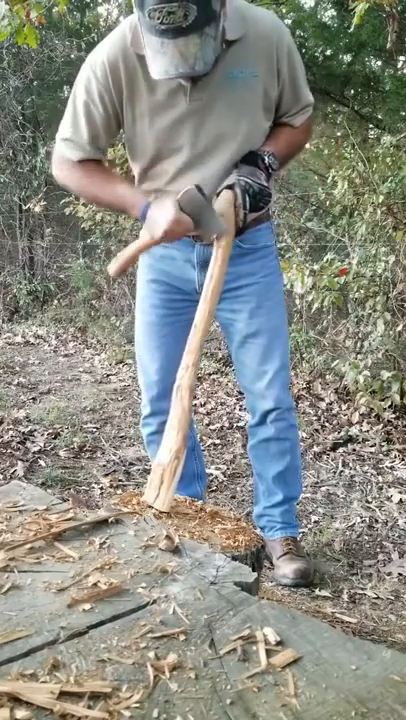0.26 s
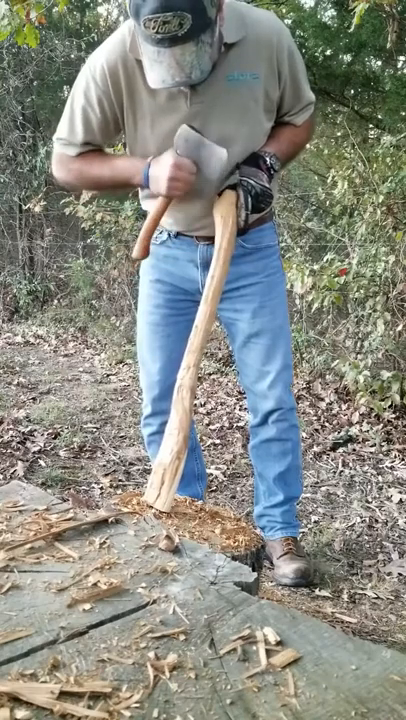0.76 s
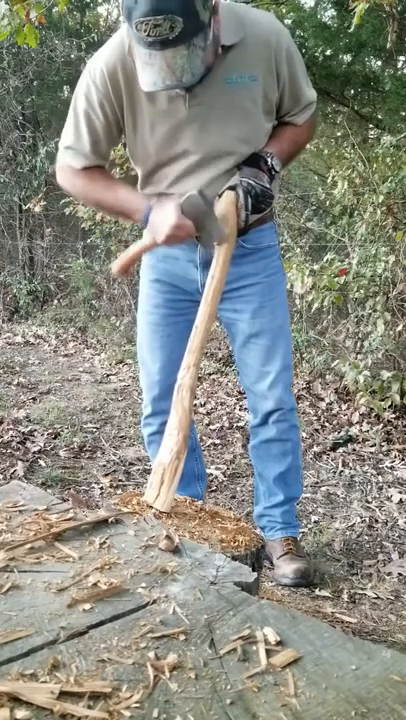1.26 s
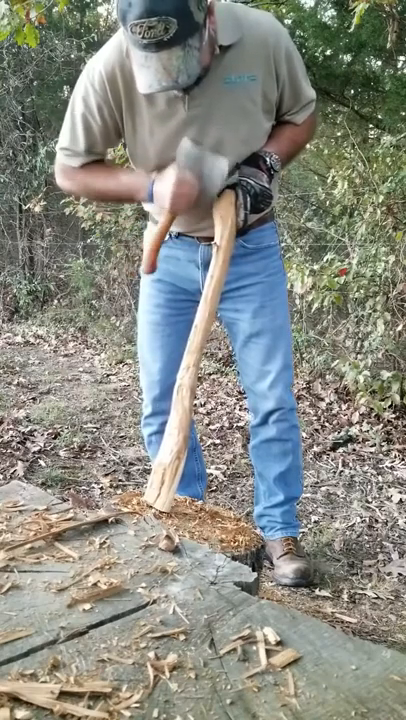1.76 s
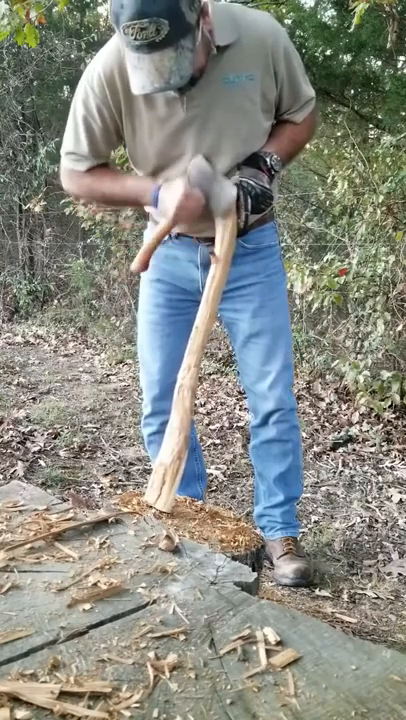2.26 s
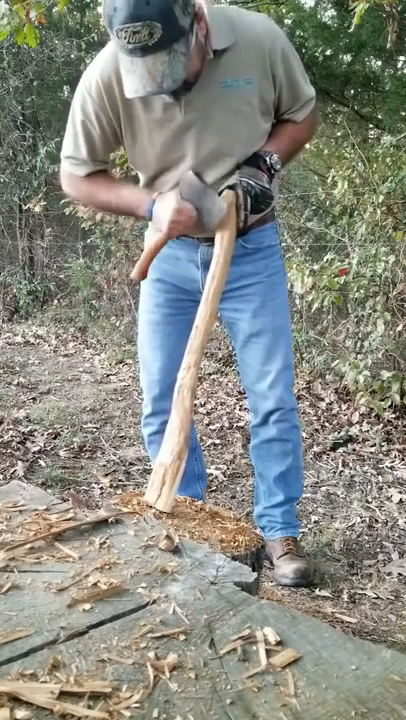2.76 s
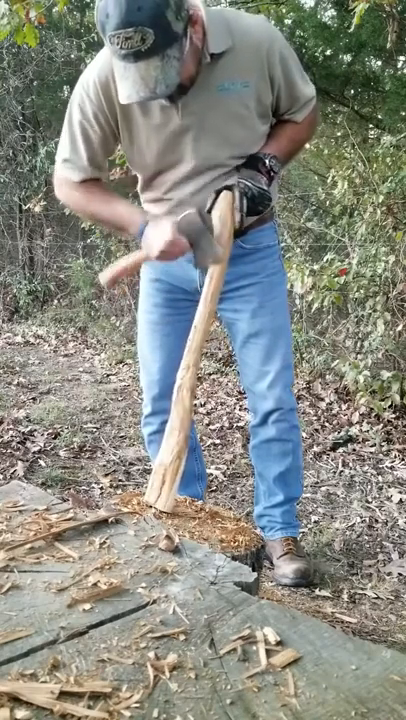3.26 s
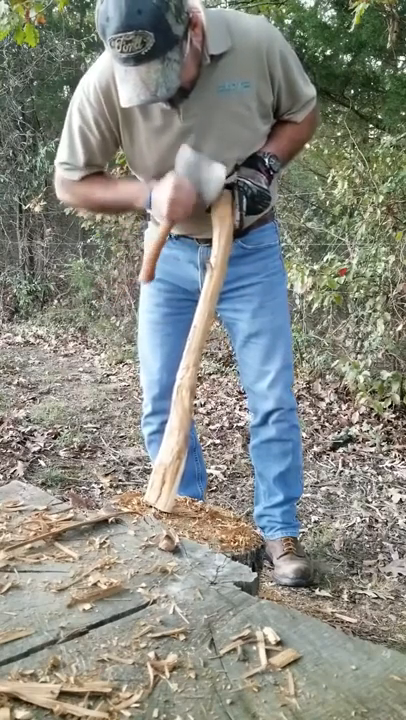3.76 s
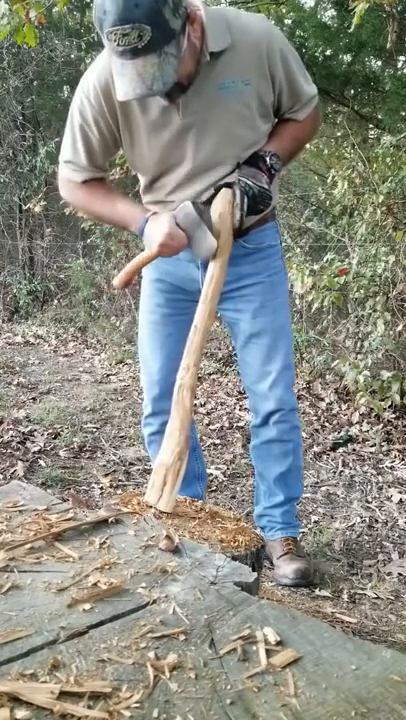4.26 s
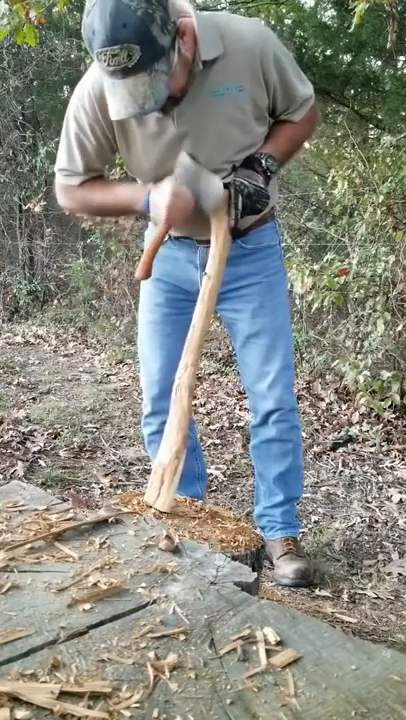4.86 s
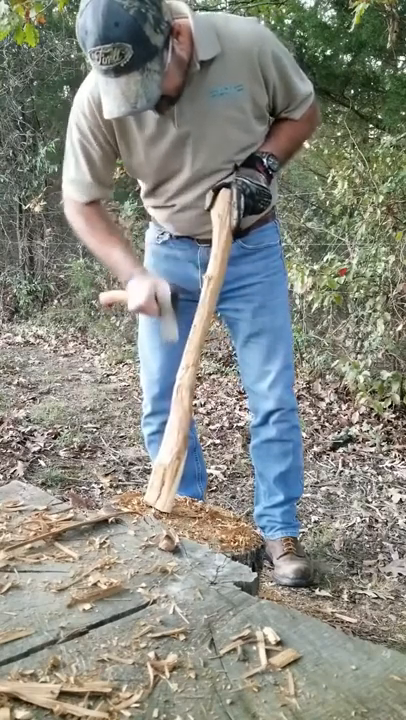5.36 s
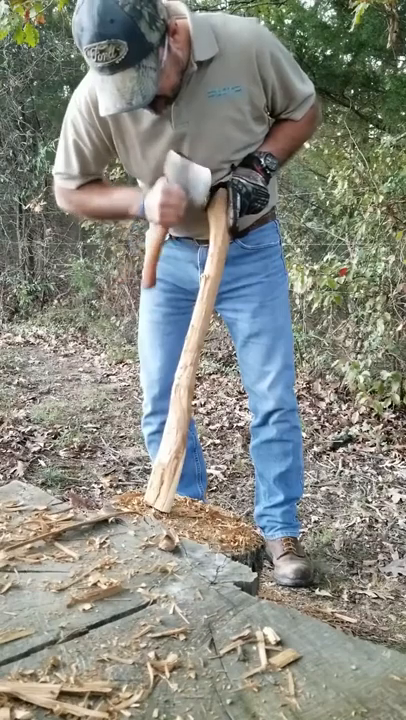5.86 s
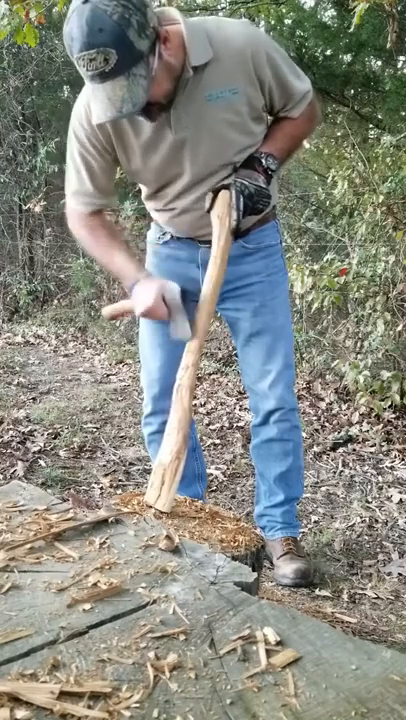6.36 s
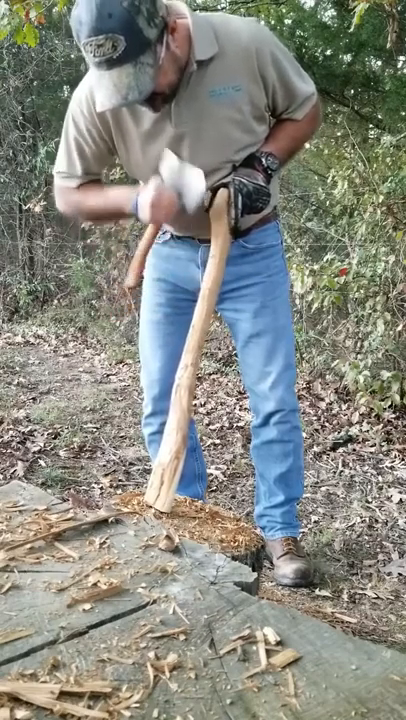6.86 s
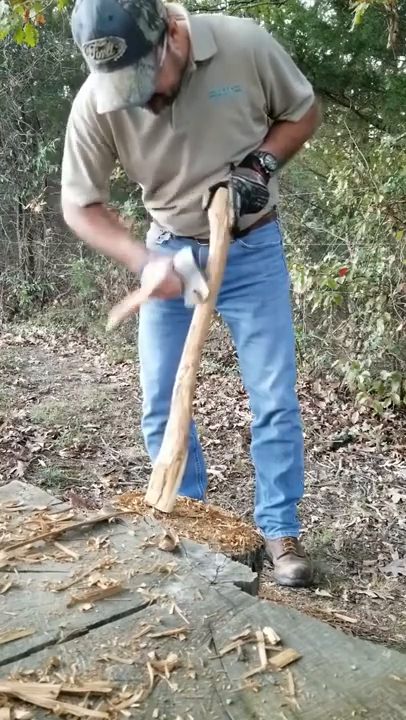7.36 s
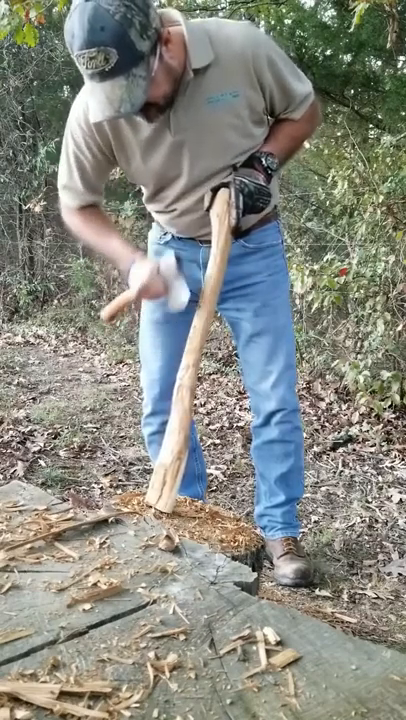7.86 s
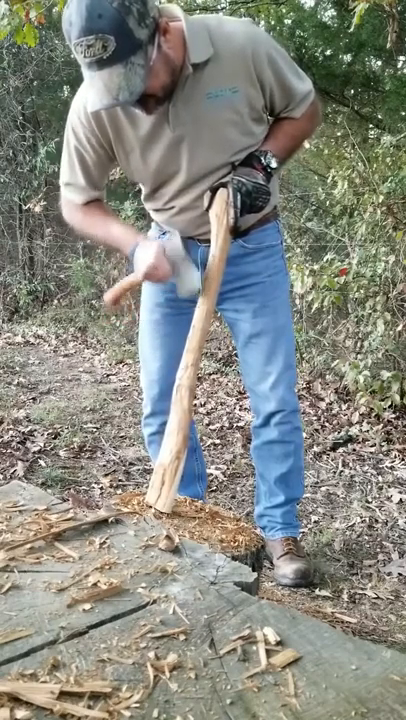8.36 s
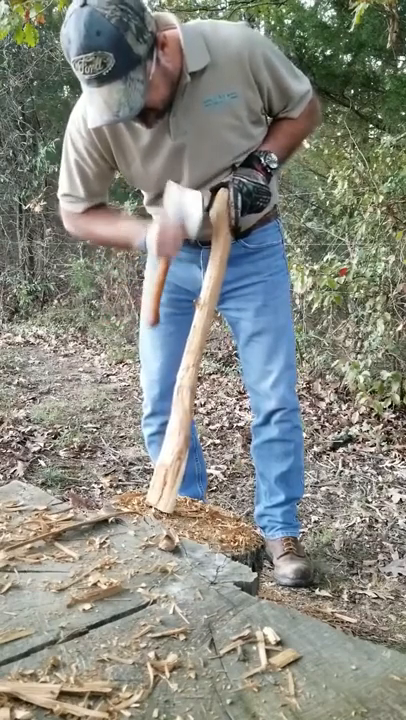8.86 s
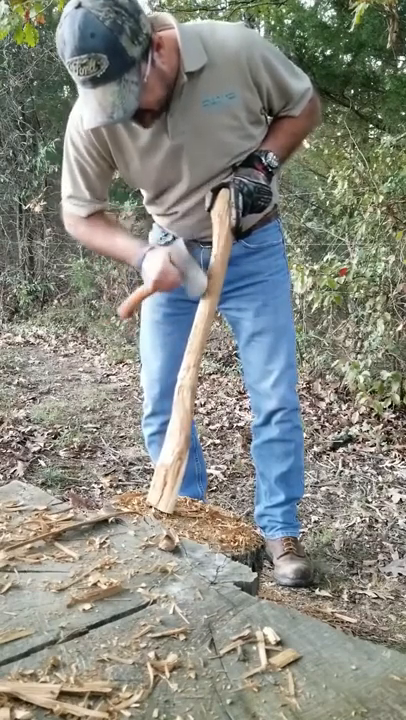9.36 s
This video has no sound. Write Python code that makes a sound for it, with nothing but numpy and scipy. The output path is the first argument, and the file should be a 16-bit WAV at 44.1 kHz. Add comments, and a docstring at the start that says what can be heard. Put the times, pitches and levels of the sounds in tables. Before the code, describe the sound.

A hatchet chops a dry hardwood stick outdoors in short runs of sharp, ringing whacks, over faint crickets and a low distant traffic hum.

```python
"""At the edge of a wood, trees still answer an earlier chop over a traffic hum and a vehicle fading out.
Six crickets trill: runs of short falling tones, smeared together by distance.
Then a man shapes a dry hardwood stick with a hatchet, in short runs of chops: noise bursts knock the wood,
decaying sines ring stick and steel, dense snaps tear splinters, and scattered echoes answer from the trees.
The blade snags, chips drop in the leaves, and late on a swing ends against the leg with a sinking thud."""
import sys
import numpy as np
from scipy import signal
from scipy.fft import rfft, irfft
from scipy.io import wavfile

SR = 44100
rng = np.random.default_rng(int(sys.argv[2]) if len(sys.argv) > 2 else 0)


def wav_out(sig):
    """Save sig, one row per channel (or a flat mono array), as 16-bit PCM at SR to the path in sys.argv[1]."""
    wavfile.write(sys.argv[1], SR, np.round(np.clip(np.atleast_2d(sig).T, -1, 1) * 32767).astype(np.int16))


N = 423360

# colour of the wood's dense, dying modes: f/Hz, gain/dB
WOOD_COLOUR = [(60, -3), (180, 9), (300, 8), (550, 12), (800, 13), (1200, 15), (2100, 17), (2850, 1),
               (3400, 11.5), (4600, 8.5), (6100, -7), (7800, 7.5), (9000, -14), (16000, -1)]
# colour of the answer from the trees: f/Hz, gain/dB
TREE_COLOUR = [(100, -28), (200, -16.5), (450, -28), (900, -26), (1250, -21), (1800, -20.5), (2800, -19),
               (3700, -14.5), (4600, -23), (6000, -16.5), (7700, -26), (12000, -20)]


def amp(db):
    """Decibels to linear gain."""
    return 10 ** (np.asarray(db) / 20)


def evened(x):
    """Bring a sound to rms 1."""
    return x / np.sqrt(np.mean(x ** 2) + 1e-20)


def read(points, hz):
    """A curve's value, interpolated on a log-frequency axis."""
    f, value = np.transpose(points)
    return np.interp(np.log(hz + 1), np.log(f + 1), value)


def add(mix, s, sound):
    """Lay a sound into the mix at s seconds, cut at the end."""
    part = mix[..., max(round(s * SR), 0):][..., :sound.shape[-1]]
    part += sound[..., :part.shape[-1]]


def colour(x, points, size=4096):
    """Causal (minimum-phase) filter with the given gains."""
    log_gain = np.log(amp(read(points, abs(np.fft.fftfreq(size, 1 / SR)))))
    spectrum = np.exp(np.conj(signal.hilbert(log_gain)))
    taps = np.fft.ifft(spectrum).real[:size // 2]
    return np.apply_along_axis(lambda row: signal.oaconvolve(row, taps)[:len(row)], -1, x)


def drift(rate, size):
    """Slow random wander of rms 1, made of noise rolled off around rate Hz."""
    rolloff = np.exp(-(np.fft.rfftfreq(size, 1 / SR) / rate) ** 2)
    return evened(irfft(rfft(rng.standard_normal(size)) * rolloff, size))


def dying(t, t60):
    """Exponential decay that falls 60 dB in t60 seconds."""
    return np.exp(-np.log(1000) * t / t60)


def crackle(envelope, per_s, spread_db):
    """Separate tiny snaps of uneven size under an envelope, energy 1."""
    size = len(envelope)
    happens = rng.random(size) < per_s / SR
    sign = rng.choice([-1, 1], size)
    strength = amp(spread_db * np.minimum(rng.exponential(1, size), 4))
    return evened(happens * sign * strength * envelope) / np.sqrt(size)


def partly_shared(draw, apart):
    """A long stick radiates a little differently toward each microphone."""
    left, other, apart = draw(), draw(), np.clip(apart, 0, 1)
    return np.array([left, np.sqrt(1 - apart ** 2) * left + apart * other])


def echoes(build):
    """Scattered echoes from trunks and leaves, one train per microphone, each band dying at its own speed."""
    # decay of the echoes: f/Hz, t60/s
    tree_decay = [(150, 0.75), (1200, 0.49), (2000, 0.49), (4000, 0.44), (7500, 0.35), (14000, .3)]
    taps = rng.standard_normal((2, SR)) * (rng.random((2, SR)) < 5000 / SR)  # 5000 echoes per s
    taps *= 1 - np.exp(-(np.arange(SR) / SR / build) ** 2)
    hz, t, bands = signal.stft(taps, SR, nperseg=256)
    fade = dying(t, read(tree_decay, hz)[:, None])
    fade_energy = np.linalg.norm(fade, axis=1, keepdims=True)
    tails = signal.istft(bands * fade / fade_energy, SR, nperseg=256)[1]
    return tails / np.linalg.norm(tails, axis=1, keepdims=True)


def earlier_chop(level_db=-2, ago=0.078):
    """The trees are still answering a chop struck just before the scene opens."""
    out = np.zeros((2, N))
    answer = colour(colour(echoes(.022), TREE_COLOUR), WOOD_COLOUR)
    add(out, 0, amp(level_db) * answer[:, int(ago * SR):])
    return out


def background(apart=.3, waver_db=1.0, rumble_gain_db=2, roar_gain_db=-0.78, swell_db=0.53):
    """Traffic rumble and tyre roar ebb slowly, with a wavering hum and a thin hiss of far insects."""
    # colour of distant traffic: f/Hz, gain/dB
    traffic_colour = [(12, -47), (20, -9), (87, 3), (135, -5), (192, -7), (281, -14), (464, -13.5),
                      (610, -10.5), (871, -9), (1100, -23), (1220, -22), (1500, -36.5), (2060, -34.5),
                      (2190, -48), (3000, -48), (3900, -64.5), (6600, -120)]
    # steady tones in the traffic: f/Hz, level before the waver/dB
    hum_tones = [(188, -79.5), (468, -83.5)]
    # colour of far insects and hiss: f/Hz, gain/dB
    air_colour = [(1500, -10), (2600, 2.5), (3300, 3.5), (3850, 17), (4300, 3), (5000, 0.5), (16000, 0.5)]
    # a vehicle is just leaving, tyres fading before engine: extra level at first/dB, fade time/s
    leaving_rumble = (5.5, 2.2)
    leaving_roar = (8.3, .8)
    traffic_db, air_db = -62.5, -76
    t = np.arange(N) / SR

    mid, side = (amp(traffic_db) * evened(colour(rng.standard_normal(N), traffic_colour)) for _ in range(2))
    side = colour(side, [(100, -7), (400, -0.5), (1200, 6.5)])
    traffic = np.array([mid + apart * side, mid - apart * side])
    rumble = signal.sosfiltfilt(signal.butter(2, 300, fs=SR, output="sos"), traffic)
    roar = traffic - rumble
    rumble_db = rumble_gain_db + leaving_rumble[0] * np.exp(-(t / leaving_rumble[1]) ** 2)
    roar_db = roar_gain_db + leaving_roar[0] * np.exp(-t / leaving_roar[1])
    rumble = rumble * amp(rumble_db + waver_db * drift(6.8, N))
    roar = roar * amp(roar_db + swell_db * drift(3.2, N))

    hum = np.zeros(N)
    for hz, db in hum_tones:
        level = amp(db + drift(2, N)) * np.sqrt(2)
        wavering_hz = hz * (1 + 0.0065 * drift(16, N))
        hum += level * np.sin(2 * np.pi * np.cumsum(wavering_hz) / SR)
    air = np.array([evened(colour(rng.standard_normal(N), air_colour)) for _ in range(2)])
    return rumble + roar + hum + amp(air_db) * air


def trill(hz, rate, length, smear, sweep=.042, haze=0.3, uneven_db=0.34):
    """Each wing stroke is a short tone that falls in pitch; distance smears the strokes together."""
    edge_s = 0.22  # swell and fade of a fully smeared trill; near ones start almost at once
    t = np.arange(int(length * SR)) / SR
    smear, stroke = np.clip(smear, 0, 1), t * rate % 1
    phase = 2 * np.pi * np.cumsum(hz * (1 + sweep * (.5 - stroke))) / SR
    pulse = np.sin(np.pi * stroke) ** 4 * amp(uneven_db * drift(20, len(t)))
    carrier = 2 * np.pi * hz * t
    scatter = np.array([drift(120, len(t)) * np.cos(carrier) + drift(100, len(t)) * np.sin(carrier)
                        for _ in range(2)])
    edges = np.minimum(np.minimum(t, length - t) / (edge_s * smear ** 3 + 1e-4), 1)
    direct = (1 - smear) * pulse * np.sin(phase)
    smeared = smear ** 2 * 2 * scatter * (haze + 0.064 * pulse)
    return edges * (direct + smeared)


def crickets():
    """Six crickets repeat their trills, each at its own pitch and distance."""
    # one row a cricket: f/Hz, level before smearing/dB, pulse rate/Hz, trill length/s,
    # smear by distance (0-1), starts of its trills t/s
    singers = [(3880, -50, 35.7, .38, .46, (1.049, 3.675, 6.828)),
               (3700, -53.5, 37, 0.506, .52, (1.296, 3.767, 6.09, 8.775)),
               (4110, -61, 33, .41, .56, (2.81, 5.36, 7.7)), (3890, -59, 24, 0.47, .76, (3.1, 5.5, 8.26)),
               (3770, -62, 29, .46, 0.63, (2.55, 4.62, 7.03, 9.38)),
               (3980, -68.5, 36, .48, 0.6, (.03, .7, 3.22, 6.15, 9.23))]
    out = np.zeros((2, N))
    for hz, db, rate, length, smear, starts in singers:
        for s in starts:
            add(out, s, amp(db) * trill(hz, rate, length, smear))
    return out


def ports(pair):
    """The right microphone hears the sound shaded, with a phase lag that varies with frequency."""
    # shading of the right microphone: f/Hz, gain/dB
    shade = [(150, -0.5), (400, -3.5), (800, -3.5), (1400, -3), (3500, 0.5), (5300, 0.5), (6500, -18),
             (7800, -12.5), (16000, -17.5)]
    # right behind left: f/Hz, phase lag/rad
    phase_lag = [(0, -0.5), (500, 0.08), (1200, 1.84), (2500, 1.33), (5000, 1.89), (8000, 3.9),
                 (16000, 2.5)]
    lag = np.interp(np.fft.rfftfreq(N, 1 / SR), *np.transpose(phase_lag))
    right = irfft(rfft(colour(pair[1], shade)) * np.exp(-1j * lag), N)
    return np.array([pair[0], right])


def follow(law, force_db, glance):
    """Level of one part of a chop, from the force of the blow and how far it slides."""
    plain_db, per_db, sliding_db = law
    return plain_db + per_db * force_db + sliding_db * glance


def stick_ring(t, thump_db, main_db, upper_db, glance, detune=0.0049, scatter_db=2.0,
               right_lag=.00008, bend_s=.005):
    """The stick's modes; grip and point of impact shift them a little, and the slow bending wave comes late."""
    # modes of the stick: f/Hz, t60/s, left level/dB, right level/dB, extra in a full slide/dB
    stick_modes = [(132.9, 0.083, -21, -20, 0), (144.8, 0.063, -20.5, -17.5, -0.5),
                   (185, 0.083, -40, -38.5, 10.5), (230, 0.11, -38.5, -42.5, -1.5),
                   (580, 0.036, -26.5, -24.5, 0.5), (726, .07, -38, -47.5, 19),
                   (1145, 0.024, -11, -12.5, 1.5), (1215.4, 0.088, -25, -20, 9.5),
                   (1264, 0.074, -27, -20, -5), (1383, 0.028, -16.5, -13, -5),
                   (1560, 0.028, -30, -26.5, -7.5), (1723, .05, -23, -19, -3.5),
                   (1795, 0.06, -22.5, -17.5, -5), (1997, 0.13, -36.5, -35, -2),
                   (2652, 0.096, -39.5, -37, 5.5), (3200, 0.045, -37, -35, -1),
                   (4750, 0.046, -35, -42.5, -3), (5295, .02, -29.5, -33.5, 3)]
    hz, t60, left_db, right_db, glance_db = np.transpose(stick_modes)
    pitch, size = rng.standard_normal((2, len(hz)))
    drive_db = np.interp(hz, [200, 500, 1400, 1700], [thump_db, main_db, main_db, upper_db])
    opposite = (-1) ** np.arange(len(hz))  # neighbouring modes start in opposite phase
    drive = opposite * amp(drive_db + glance * glance_db + scatter_db * size)
    mode_hz = (hz * (1 + detune * pitch))[:, None]
    bending = (hz < 200)[:, None]
    ears = []
    for ear_db, lag in ((left_db, 0), (right_db, right_lag)):
        age = np.maximum(t - lag - bend_s * bending, 0)
        waves = np.sin(2 * np.pi * mode_hz * age) * dying(age, t60[:, None])
        ears.append((drive * amp(ear_db)) @ waves)
    return np.array(ears)


def impact(t, knock_db, crack_db, crunch_t60, sharp, bite=.65, wood_t60=0.077):
    """A sharp push with a short crunch as the edge sinks in, then the dense modes of the wood."""
    # colour of the blow: f/Hz, gain/dB
    blow_colour = [(60, -22.5), (200, 0), (400, 16), (560, 18), (720, 8.5), (1100, 21), (1500, 16.5),
                   (2200, 5), (2900, 6.5), (3600, 2.5), (4700, 11.5), (6200, -4), (9000, -17),
                   (16000, -7.5)]
    push = bite * partly_shared(lambda: crackle(dying(t, crunch_t60), per_s=8300, spread_db=0.5), apart=0.95)
    push = signal.sosfilt(signal.butter(2, 1500, "high", fs=SR, output="sos"), push)
    push[:, 0] += sharp  # a single click at the moment of contact
    wood = partly_shared(lambda: evened(rng.standard_normal(len(t)) * dying(t, wood_t60)), apart=.65)
    wood = wood / np.sqrt(len(t))
    blow = colour(push, blow_colour) + colour(wood, WOOD_COLOUR)
    return colour(blow, [(900, knock_db), (3000, crack_db)])


def steel_ring(t, glance, grip, free=0.43, damped=.3, scatter_db=2.0, detune=0.005, clamp=0.022):
    """The head rings longer when it slides off; gripped by the wood (0-1) it is damped and a little sharp."""
    # modes of the hatchet head: f/Hz, free t60 in a square blow/s, level/dB
    head_modes = [(7590, .06, -34), (7700, 0.048, -27), (7940, .035, -33), (8080, 0.027, -38)]
    ring = np.zeros(len(t))
    for hz, t60, db in head_modes:
        level = amp(db + scatter_db * rng.standard_normal())
        mode_hz = hz * (1 + clamp * grip + detune * rng.standard_normal())
        decay = dying(t, t60 * (1 + free * glance) / (1 + damped * grip))
        ring += level * np.sin(2 * np.pi * mode_hz * t) * decay
    return ring


def splinter(t, gives, tear_t60=0.042, snap_t60=0.0031, snap=2.3, first=0.53, last=.7):
    """Fibres tear under rising strain, give with a snap, and die away."""
    after = np.maximum(t - gives, 0)
    rising = first + (last - first) * t / gives
    release = dying(after, tear_t60) + snap * dying(after, snap_t60)
    strain = np.where(t < gives, rising, release)
    return partly_shared(lambda: crackle(strain, per_s=7000, spread_db=-0.5), apart=0.87)


def hatchet(steel_db=-2.0, grip_from_db=-5, grip_range_db=7.0, snag_ring_db=-3,
            snag_thump_db=-16, snag_crack_db=-4.0, snag_steel_db=2.0):
    """All chops, snags and falling chips, as they reach the two microphones."""
    # one row a chop: t/s, force/dB, glance (0 square bite - 1 sliding blow), crack/dB,
    # bending thump/dB, steel ring/dB, splinter/dB; levels are relative
    chop_rows = [(.237, -0.5, 0.33, 0, 4, -10, -5.5), (.5518, 0.5, 0.38, -3.5, 0, -7, 2.5),
                 (1.233, 0.5, 0.079, -7, -4, 2, -1), (1.5355, 2.5, 0.33, -.5, -6, 2.5, -.5),
                 (1.8235, 1.5, 0.19, -2, 3, 6.5, -1.5), (2.1117, 1, 0.028, 0, 0, 7, 5),
                 (2.424, -2.5, 0.22, 0, -13, 13.5, -0.5), (3.223, -1, 0, -7, -5.5, 1, -6),
                 (3.5322, 1, 0, .5, -4.5, 4, 0.5), (3.8308, -0.5, 0.3, -3, -5, 6.5, -3.5),
                 (4.7119, -5.5, .1, -13, -9, -8.5, -2), (5.0037, -2, 0.54, -2.5, 1.5, 3, 3.5),
                 (5.2844, -7, .7, -16, -8.5, 1, -3.5), (5.9444, -2.5, .75, -10.5, -8.5, -3, -10.5),
                 (6.2945, -2, 1, -4.5, -12, 1, -10.5), (7.025, 0, 0.45, -1.5, -3, 6.5, -0.5),
                 (7.352, -1, 0.93, -0.5, -8, 6.5, 1), (7.6921, .5, 0.85, 0.5, -16.5, 4.5, -3.5),
                 (8.5997, 1, .25, 2.5, -10.5, 4, -1), (8.9195, 1.5, 0.68, 0, -7, -3.5, -2.5)]
    # the blade catches again, or a split runs on: t/s, strength/dB
    snag_rows = [(0.559, -4.5), (2.1191, -3), (5.278, -20.5), (5.3008, -7.5), (5.3333, -18), (5.9666, -8.5),
                 (6.31, -5), (7.3709, -16), (7.7051, -8.5), (7.7295, -13)]
    # chips land in the leaves: t/s, rustle/dB, woody tap/dB
    chip_rows = [(.769, -31, -17.5), (2.727, -27, -17.5), (4.087, -39, -25), (4.227, -42, -24),
                 (7.837, -29, -6), (8.002, -26, -21), (8.085, -25, -25.5), (9.17, -39.5, -27)]
    # how parts of a chop follow the blow: plain square chop/dB, slope with force (dB per dB),
    # extra in a full slide/dB
    knock_law = (-0.69, 0.9, 1)
    main_law = (0, .6, -.8)
    upper_law = (1.8, 1.5, -1.8)
    # colour of tearing fibres: f/Hz, gain/dB
    fibre_colour = [(300, -12), (2000, -14), (4500, 3), (6200, -11), (7900, 6.5), (9200, -12), (11000, 1),
                    (13500, -0.5), (16000, -2.5)]
    # colour of a chip's tap: f/Hz, gain/dB
    tap_colour = [(400, -3), (1900, -3.5), (3000, -29), (4300, -1), (9000, -24)]
    bite_t60, scrape_t60 = .011, .03  # s, crunch of a clean bite and of a scraping snag
    gives_s, slide_s = .008, .006  # a splinter gives this long after a square bite, later in a slide
    deeper_s_per_db = .0002  # a harder blow sinks in for longer
    chip_settle_s = 0.02

    t = np.arange(SR // 4) / SR
    ring, blows, fibres = np.zeros((3, 2, N))
    for s, force, glance, crack, thump, steel, tear in chop_rows:
        knock, main, upper = (follow(law, force, glance) for law in (knock_law, main_law, upper_law))
        grip = np.clip((tear - grip_from_db) / grip_range_db, 0, 1)  # a big splinter wedges the blade
        gives = max(gives_s + slide_s * glance + deeper_s_per_db * force, 1e-3)
        add(ring, s, stick_ring(t, thump, main, upper, glance))
        add(blows, s, impact(t, knock, crack, bite_t60, sharp=0.91))
        add(blows, s, amp(steel + steel_db) * steel_ring(t, glance, grip))
        add(fibres, s, amp(tear) * splinter(t, gives))
    for s, db in snag_rows:
        add(ring, s, amp(db + snag_ring_db) * stick_ring(t, snag_thump_db, 0, 0, 0.88))
        add(blows, s, amp(db) * impact(t, 0, snag_crack_db, scrape_t60, sharp=0.18))
        add(blows, s, amp(db + snag_steel_db) * steel_ring(t, 0.98, 0))
    settle = np.exp(-t / chip_settle_s)
    for s, rustle_db, tap_db in chip_rows:
        add(fibres, s, amp(rustle_db) * crackle(settle, per_s=1500, spread_db=0.0))
        tap = colour(crackle(settle, per_s=930, spread_db=1.0), tap_colour)
        add(blows, s, amp(tap_db) * tap)
    return ring + ports(blows + colour(fibres, fibre_colour))


def trees(x, build=0.019, ground_db=-17, ground_s=.0065):
    """A ground bounce, then scattered tree echoes, blended between two patterns so no tone stands out."""
    source = colour(x[0] + 0.36 * x[1], TREE_COLOUR)
    turn = 2 * np.pi * np.arange(N) / SR * .7  # blends two echo patterns at 0.7 Hz
    wet = np.zeros((2, N))
    for share in (np.cos(turn), np.sin(turn)):
        wet += signal.oaconvolve((source * share)[None], echoes(build), axes=1)[:, :N]
    wet[1] = colour(wet[1], [(500, -2.0), (1500, 0.5), (5000, 2), (7500, -3.0), (14000, -6.5)])
    add(wet, ground_s, amp(ground_db) * x)
    return wet


def thud(level_db=-52, start_hz=155, end_hz=80, scuff_db=-56, scuff_t60=0.81):
    """The swing ends against the leg: a soft rumble that sinks in pitch, with a rough scuff of cloth."""
    # start t/s, length/s
    thud_time = (7.765, .135)
    s, length = thud_time
    hz = np.geomspace(start_hz, end_hz, int(length * SR))
    t, phase = np.arange(len(hz)) / SR, 2 * np.pi * np.cumsum(hz) / SR
    body = np.sin(phase) * drift(30, len(hz)) + np.cos(phase) * drift(30, len(hz))
    cloth = [(100, -13), (320, 3), (600, -10), (1500, -32), (6000, -60)]
    scuff = evened(colour(rng.standard_normal(len(t)), cloth)) * dying(t, scuff_t60)
    soft_edges = signal.windows.tukey(len(t), .15)
    out = np.zeros(N)
    add(out, s, (amp(level_db) * body + amp(scuff_db) * scuff) * soft_edges)
    return out


def scene():
    """The chops and their answer from the trees, over crickets and traffic."""
    chops = hatchet()
    return earlier_chop() + background() + crickets() + chops + trees(chops) + thud()


def record(dry, bass_hz=42):
    """The microphones shed deep bass; the loudest peaks are rounded off; then the band limit."""
    lean = signal.sosfilt(signal.butter(2, bass_hz, "high", fs=SR, output="sos"), dry)
    rounded = lean / (1 + lean ** 4) ** .25
    band_limit = signal.firwin(301, 16050, window=("kaiser", 8), fs=SR)
    return signal.oaconvolve(rounded, band_limit[None], "same")


dry = scene()
out = record(dry)
wav_out(out)
```